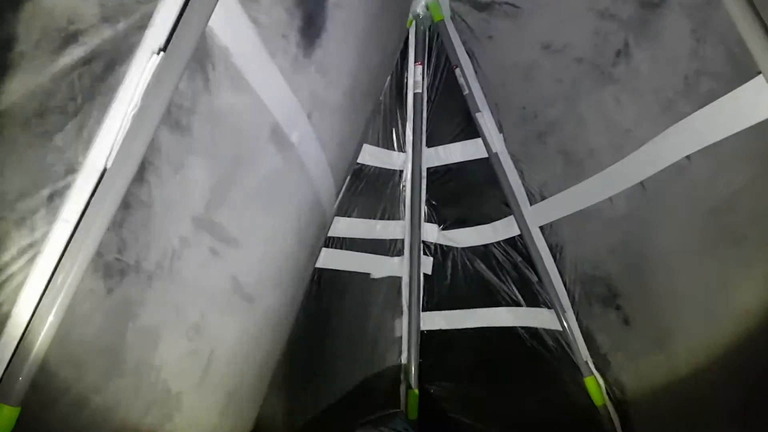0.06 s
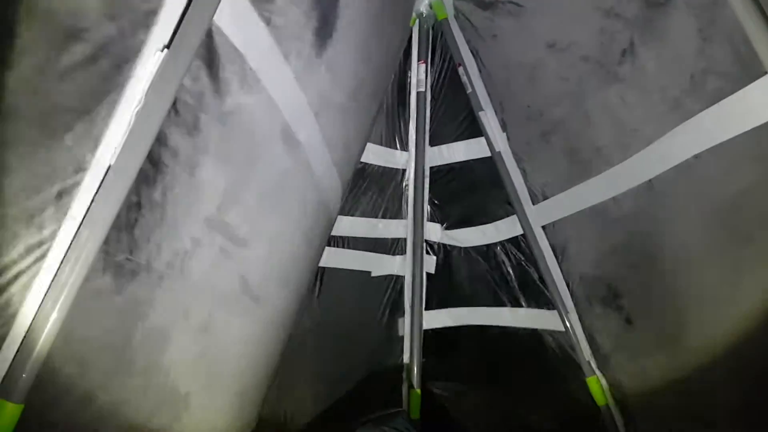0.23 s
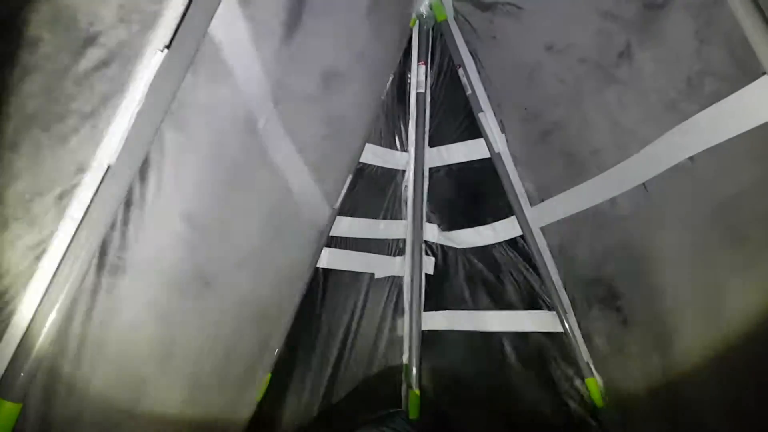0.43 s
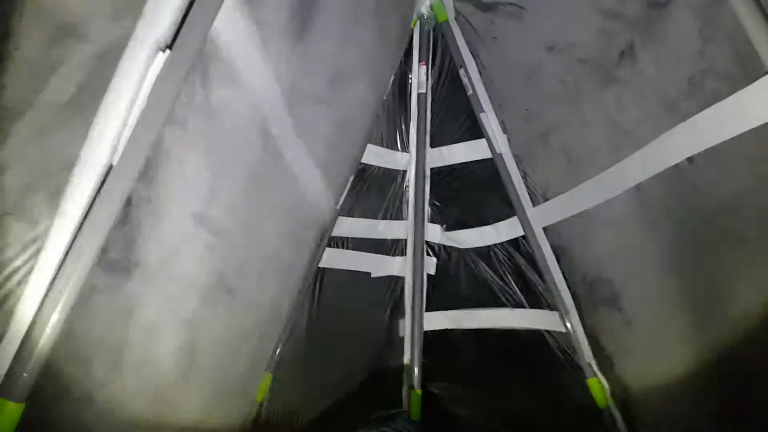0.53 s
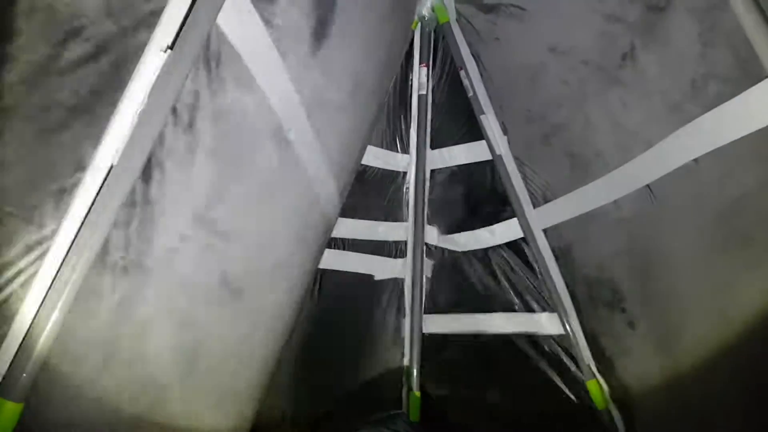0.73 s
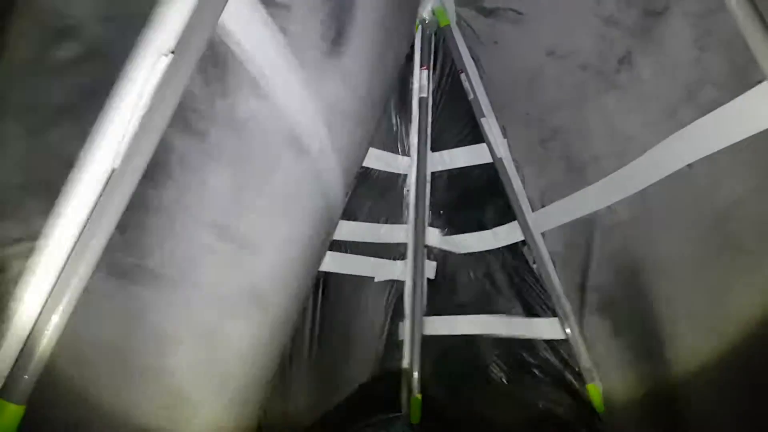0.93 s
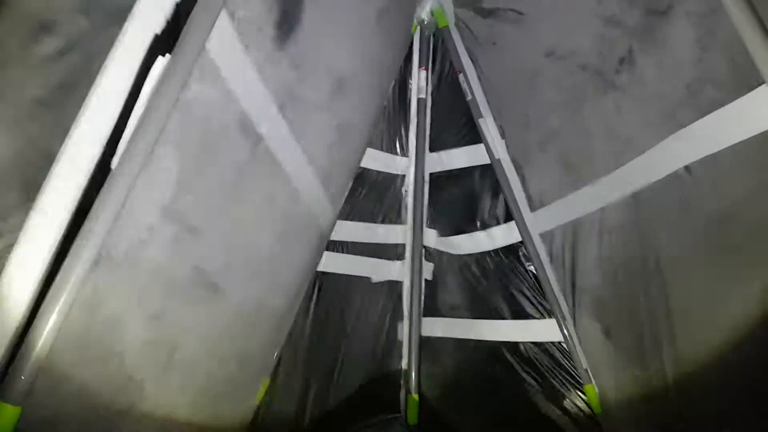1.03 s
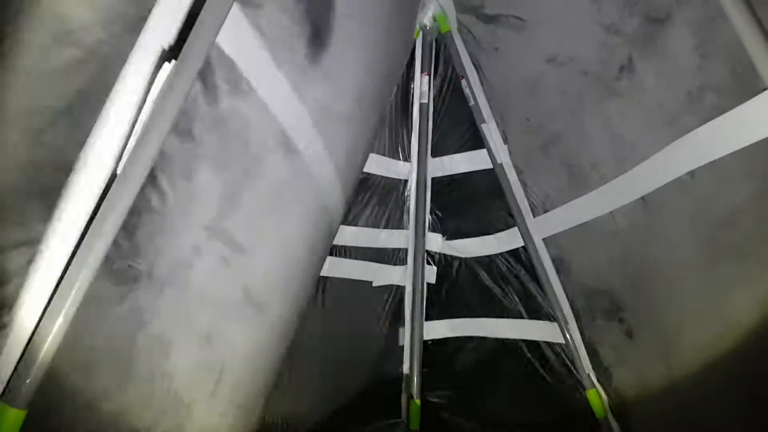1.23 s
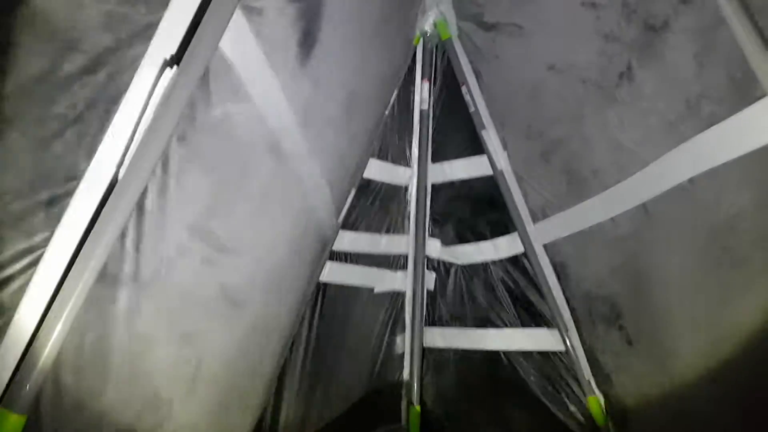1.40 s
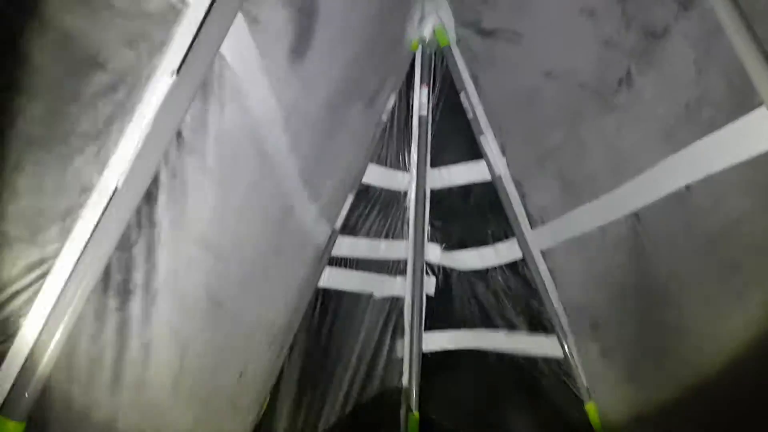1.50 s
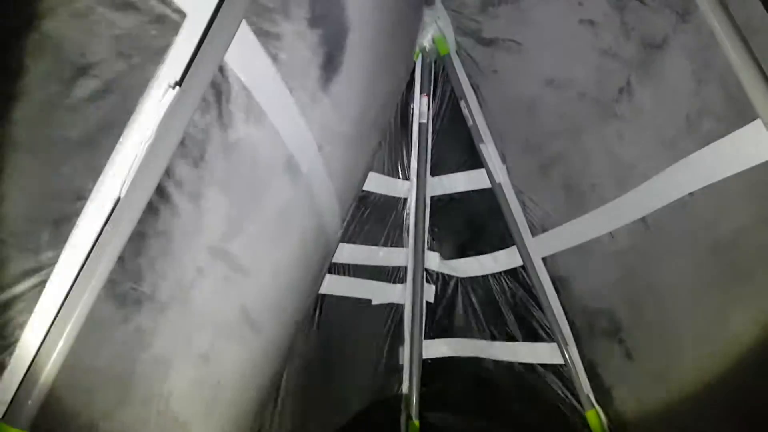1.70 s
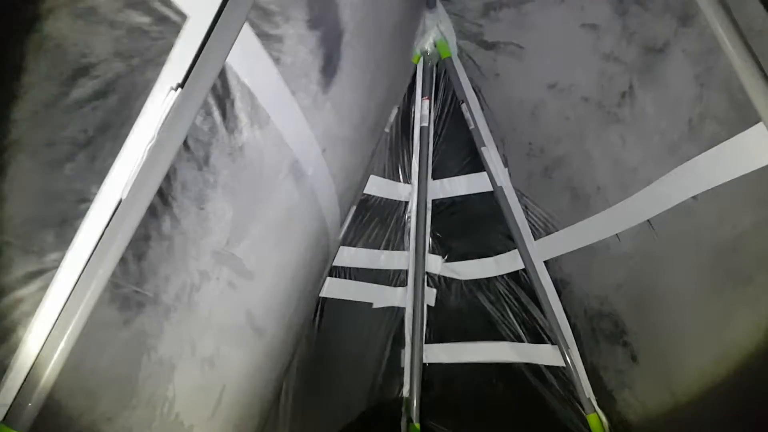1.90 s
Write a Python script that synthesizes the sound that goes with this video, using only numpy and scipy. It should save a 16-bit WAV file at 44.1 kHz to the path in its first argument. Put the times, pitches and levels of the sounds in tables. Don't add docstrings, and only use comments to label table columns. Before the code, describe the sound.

Plastic sheeting of a small tent rustles quietly in wind, heard close in stereo. From about 0.4 s a gust brings dense crackling, slaps, bright swishes against poles and low panel thumps, strong through 1.1 s, with heavy thumps near 0.9 and 1.1 s. After a brief lull, hard ringing snaps crack around 1.4 s, then it fades to soft rumble and faint crackles, with a small flap near 1.8 s.

```python
import sys
import numpy as np
from scipy import signal
from scipy.fft import rfft, irfft, next_fast_len
from scipy.io import wavfile
from scipy.ndimage import uniform_filter1d

SR = 44100
rng = np.random.default_rng(int(sys.argv[2]) if len(sys.argv) > 2 else 0)


def put_to_file(sound):
    columns = np.atleast_2d(sound).T
    safe = np.clip(columns, -1, 1)
    whole_steps = np.round(safe * 32767)
    wavfile.write(sys.argv[1], SR, whole_steps.astype(np.int16))


def field_ratio(decibels):
    return 10 ** (np.asarray(decibels, dtype=float) / 20)


N = 85995


def colour(x, points):
    hz, db = np.array(points, float).T
    f = np.maximum(np.fft.rfftfreq(8192, 1 / SR), 5)
    cepstrum = irfft(np.interp(np.log(f), np.log(hz), db) * np.log(10) / 20)
    cepstrum[1:4096] *= 2
    cepstrum[4097:] = 0
    response = irfft(np.exp(rfft(cepstrum)))[None, :4096]
    return signal.fftconvolve(x, response, axes=1)[:, :N]


def unit(x):
    return x / np.sqrt(np.mean(x ** 2))


def walk(rate):
    hold = int(SR / rate)
    steps = np.repeat(rng.standard_normal(N)[:N // hold + 1], hold)
    return 1.4 * uniform_filter1d(uniform_filter1d(steps, hold), hold)[:N]


# time in seconds, force on the panels in dB, creasing relative to it in dB.
GUSTS = [(0, -34, -2), (.17, -30.5, -4.5), (0.268, -20.5, -5.5), (.35, -28, 2.5), (.43, -15.5, -5),
         (0.521, -24, -2), (.62, -22, -2.5), (.75, -22.5, -2), (.9, -18, -5.5), (1.05, -23, -1.5),
         (1.1, -22.5, -3.5), (1.181, -23.5, -4.5), (1.23, -31, -4), (1.4, -27.5, 2), (1.5, -29, -5.5),
         (1.6, -36.5, -3), (1.8, -32, -8), (1.95, -33, -11)]


def gust(col):
    g = np.array(GUSTS)
    return np.interp(np.arange(N) / SR, g[:, 0], g[:, col])


def creasing():
    return gust(1) + gust(2)


# frequency in Hz, level in dB per Hz.
PANEL_COLOUR = [(15, -31), (30, -14), (60, -3.5), (120, -7), (250, -8), (380, -15), (1100, -26.5),
                (2000, -74.5)]
DEEP_HZ, DEEP_FORCE_DB, DEEP_FOLLOWS = 75, -22, 0.17


def billow():
    rumble = unit(colour(rng.standard_normal((3, N)), PANEL_COLOUR))
    deep = signal.sosfiltfilt(signal.butter(2, DEEP_HZ, fs=SR, output="sos"), rumble)
    swell = field_ratio(DEEP_FOLLOWS * (gust(1) - DEEP_FORCE_DB))
    return (rumble - deep + deep * swell) * field_ratio(gust(1) + 1.6 * walk(20.28))


def edge(f, hz):
    return 1 - f ** 6 / (f ** 6 + hz ** 6. + 1e-9)


SIZE_EDGES_HZ = [0, 900, 2200, 5000, 8500, SR]
POP_S, TOGETHER = 0.01, 0.37


def clicks(rate, spread_db):
    hit, size = rng.random((2, len(SIZE_EDGES_HZ), N))
    power = (hit < rate / SR) * field_ratio(-2 * spread_db * np.log(size + 1e-9))
    power = signal.lfilter([1], [1, -np.exp(-np.log(1e6) / (POP_S * SR))], power)
    f = np.fft.rfftfreq(N, 1 / SR)
    noise = rfft(rng.standard_normal((3, N)))
    out = np.zeros((3, N))
    for own, lo, hi in zip(power[1:], SIZE_EDGES_HZ, SIZE_EDGES_HZ[1:]):
        band = irfft(noise * (edge(f, hi) - edge(f, lo)), N)
        out += np.sqrt(TOGETHER * power[0] + (1 - TOGETHER) * own) * band
    return unit(out)


def bumps(rows):
    t, r = np.arange(N) / SR, np.array(rows)
    bells = .5 ** ((2 * (t - r[:, :1]) / r[:, 1:2]) ** 2)
    return np.sqrt((field_ratio(2 * r[:, 2:3]) * bells).sum(0))


# frequency in Hz, level in dB per Hz.
CREASE_COLOUR = [(150, -16.5), (500, -4), (1000, -5), (2500, -9), (4500, -19), (6000, -32), (8300, -32),
                 (16000, -58)]
# time in seconds, length in seconds, level in dB.
SLAPS = [(.112, 0.0061, -56), (.196, 0.013, -31.5), (.28, 0.05, -31), (.389, 0.0051, -24),
         (.405, 0.0043, -14.5), (.436, 0.0074, -25), (.462, .015, -26), (.531, 0.0041, -26),
         (.599, 0.0056, -17.5), (.635, 0.024, -21.5), (.717, 0.0037, -19), (.751, 0.028, -24),
         (.802, 0.0092, -22.5), (.853, 0.013, -19), (.89, 0.0058, -19.5), (.927, 0.062, -19.5),
         (1.006, 0.014, -18.5), (1.031, 0.016, -20), (1.075, 0.0026, -12), (1.09, 0.012, -17.5),
         (1.124, 0.01, -21), (1.157, 0.01, -24.5), (1.145, 0.0083, -31.5), (1.195, 0.013, -29),
         (1.273, 0.0045, -28), (1.345, .007, -25), (1.37, .009, -23), (1.404, 0.0027, -19),
         (1.416, 0.016, -19.5), (1.473, 0.0059, -28), (1.502, 0.033, -32.5), (1.813, 0.0035, -32),
         (1.905, 0.0087, -37.5)]
CREASE_RATE, CREASE_SPREAD_DB, FLUTTER_DB = 1200, 1.5, -0.5
SLAP_RATE, SLAP_SPREAD_DB = 2500, 2.5


def crackle():
    steady = unit(colour(clicks(CREASE_RATE, CREASE_SPREAD_DB), CREASE_COLOUR))
    steady = steady * field_ratio(creasing() + FLUTTER_DB * walk(30.1))
    slap = unit(colour(clicks(SLAP_RATE, SLAP_SPREAD_DB), CREASE_COLOUR))
    return steady + slap * bumps(SLAPS)


# frequency in Hz, level in dB per Hz.
SLIDE_COLOUR = [(1500, 5), (4000, 6.5), (8200, 0.5), (8800, -7.5), (10500, -6), (13000, -1), (14500, -7.5),
                (16000, -0.5)]
# time in seconds, length in seconds, level in dB, brightness in dB.
SWISHES = [(0.065, 0.049, -43.5, 2), (0.11, 0.014, -40.5, 2), (.15, 0.048, -43.5, 6),
           (0.283, 0.033, -51, 14), (0.32, 0.014, -42, 0), (0.387, 0.013, -28, 6.5),
           (0.409, 0.016, -36.5, -1.5), (0.437, 0.005, -33, -0.5), (0.511, 0.015, -40, 1),
           (0.53, 0.011, -39, -4.5), (0.596, 0.019, -40, 3), (0.644, 0.025, -38, -1),
           (0.678, 0.024, -38, -1), (0.702, 0.021, -34.5, 3), (0.774, 0.021, -40.5, -2),
           (0.808, 0.02, -42, -0.5), (0.853, 0.009, -43.5, -8), (0.888, 0.024, -36.5, 0),
           (1.027, 0.0058, -37, 3), (1.064, .008, -38, 5), (1.084, 0.014, -39, -3.5),
           (1.263, 0.025, -37, 0), (1.341, 0.0048, -43, 10), (1.371, 0.0048, -35, 6),
           (1.412, 0.038, -43.5, -1.5), (1.473, 0.0058, -49, -2), (1.502, 0.0049, -49.5, -5),
           (1.68, 0.024, -60, -5), (1.754, 0.029, -53, -1), (1.86, .04, -61, 0), (1.196, 0.012, -61, -4),
           (1.902, 0.017, -55.5, -4.5)]
SLIDE_RATE, SLIDE_SPREAD_DB = 3800, 2
SLIDE_DB, SLIDE_FOLLOWS, SWISH_DB = -38, 0.95, 12


def slide():
    bed = field_ratio(SLIDE_DB + SLIDE_FOLLOWS * (creasing() + 30) + 2.2 * walk(20.12))
    friction = unit(colour(clicks(SLIDE_RATE, SLIDE_SPREAD_DB), SLIDE_COLOUR))
    highpass = signal.butter(4, SIZE_EDGES_HZ[4], "high", fs=SR, output="sos")
    top = signal.sosfiltfilt(highpass, friction)
    r = np.array(SWISHES)
    bright = bumps(r) * field_ratio(SWISH_DB)
    dull = bumps(np.c_[r[:, :2], r[:, 2] - r[:, 3]]) * field_ratio(SWISH_DB)
    return top * np.hypot(bed, bright) + (friction - top) * np.hypot(bed, dull)


TICK_HZ = 175 * 2 ** np.arange(0, 5.1, .5)
TICK_RATE, TICK_SPREAD_DB, TICK_Q, TICK_DB = 66, 3, 1.23, -9


def ticks():
    hit, size, sign = rng.random((3, len(TICK_HZ), N))
    kicks = (hit < TICK_RATE / SR) * field_ratio(-TICK_SPREAD_DB * np.log(size + 1e-9)) * np.sign(sign - .5)
    rung = []
    for hz, kick in zip(TICK_HZ, kicks):
        ring = unit(signal.lfilter(*signal.iirpeak(hz, TICK_Q, fs=SR), kick))
        rung.append(ring * (hz / 1000) ** -.3)
    rung = np.array(rung)
    both = rung.sum(0)
    apart = rung[::2].sum(0) - rung[1::2].sum(0)
    return unit(np.array([both, both, apart])) * field_ratio(creasing() + TICK_DB)


def rings(rows, cycles, sweep):
    out = np.zeros(N)
    for s, db, hz in rows:
        i = np.arange(int(s * SR) + 1, min(int((s + 4 * cycles / hz) * SR), N))
        c = (i / SR - s) * hz
        shape = (1 - np.exp(-c / 0.3)) * np.exp(-(c / cycles) ** 2)
        out[i] -= field_ratio(db) * np.sin(2 * np.pi * c ** sweep) * shape
    return out


# time in seconds, level in dB, pitch in Hz.
THUMPS = [(.0815, -22, 114), (.404, -39, 165), (.4155, -14, 158), (.4315, -19, 134), (.545, -14, 134),
          (.783, -13.5, 148), (.8775, -4, 169), (.981, -14, 128), (1.0748, -4, 176), (1.171, -15, 132),
          (1.291, -17.5, 147), (1.3385, -11, 237), (1.367, -13.5, 150), (1.4155, -10, 230),
          (1.44, -13.5, 293), (1.471, -24, 207), (1.5015, -17, 180), (1.79, -22, 158), (1.859, -20.5, 170)]
# time in seconds, level in dB, pitch in Hz.
MORE_THUMPS = [(0.0513, -26, 380), (.139, -24.5, 226), (0.2683, -22, 193), (0.311, -22, 272),
               (0.3224, -17.5, 380), (0.3799, -14.5, 159), (0.408, -6, 315), (0.4386, -7, 123), (.46, -10.5, 274),
               (.476, -14.5, 273), (0.4823, -14.5, 161), (0.511, -11.5, 159), (0.5499, -9.5, 193),
               (.623, -13, 317), (.649, -10, 266), (.682, -14, 314), (0.697, -12, 113), (0.7164, -15, 320),
               (0.765, -13.5, 160), (0.806, -9, 231), (0.857, -11, 378), (0.8991, -15, 383), (.92, -11.5, 232),
               (0.9605, -12.5, 100), (1.0238, -12.5, 320), (1.045, -11, 226), (1.089, -28, 190),
               (1.098, -8.5, 150), (1.196, -17.5, 380), (1.271, -22, 190), (1.4002, -15, 230), (0.451, -11.5, 75),
               (.418, -14, 80), (1.08, -13, 90), (.846, -13, 95), (.042, -24, 95), (1.198, -17.5, 90),
               (1.662, -27, 270), (1.6826, -22, 273)]


def thumps():
    swings = rings(THUMPS + MORE_THUMPS, cycles=1.0, sweep=0.65)
    highpass = signal.butter(2, DEEP_HZ - 20, "high", fs=SR, output="sos")
    low = signal.sosfiltfilt(highpass, swings)
    return field_ratio(6) * low * np.array([[1], [.3], [-.3]])


# time in seconds, level in dB, ring in Hz.
CRACKS = [
    (.4229, -21, 1200),
    (.452, -24, 885),
    (1.0857, -13, 3300),
    (1.397, -12, 1800),
    (1.4712, -19, 960),
    (1.4714, -22, 3570),
    (1.416, -13.5, 2300),
    (1.502, -20, 1220),
    (1.812, -43, 2420),
]
# time in seconds, level in dB, ring in
# Hz.
MORE_CRACKS = [(0.1126, -22, 3900), (0.223, -20, 4000), (0.269, -19, 1980), (0.281, -20, 1200),
               (0.387, -12, 2850), (.402, -17, 2380), (.4025, -16.5, 606), (0.409, -18, 2380),
               (.4121, -21, 2380), (0.4228, -16, 2830), (.5258, -20, 4760), (0.5912, -16, 1680),
               (0.624, -19, 2830), (.6664, -15, 2000), (0.6794, -19, 4000), (0.7506, -13, 1410),
               (0.7755, -13.5, 1680), (0.799, -17, 4760), (.8217, -18, 2400), (0.8496, -20, 4000),
               (.8558, -26, 4000), (0.891, -16, 2380), (0.893, -10.5, 4760), (.9168, -16, 2000),
               (.924, -15, 990), (0.9411, -9.5, 1705), (0.992, -15.5, 830), (1.0993, -22, 4760),
               (1.157, -22, 4000), (1.173, -22, 2000), (1.2575, -23, 4760), (1.27, -22, 4000),
               (1.3445, -23, 2850), (1.3691, -14.5, 2860), (1.399, -21, 4760), (1.4177, -21, 4760),
               (1.5013, -26, 4700), (1.5084, -23, 1170), (1.5107, -27, 2830), (1.9049, -35, 2830)]
# time in seconds, level in dB, ring in Hz.
SINGING = [
    (1.0738, -12, 1190),
    (1.0742, -10, 2040),
    (1.4022, -9.5, 704),
    (1.4032, -8, 2400),
    (1.4035, -11, 3630),
    (1.4155, -15, 714),
]


def cracks():
    high = rings(CRACKS + MORE_CRACKS, cycles=2.8, sweep=1.0) + rings(SINGING, cycles=3.6, sweep=1)
    return high * np.array([[1], [.9], [.9]])


LAG_S, ALIKE_HZ, ALIKE_HIGH = 0.000416, 693, 0.017


def ports(x):
    n = next_fast_len(N + 4096)
    f = np.fft.rfftfreq(n, 1 / SR)
    low = 1 / (1 + (f / ALIKE_HZ) ** 2)
    alike = np.clip(ALIKE_HIGH + (.96 - ALIKE_HIGH) * low, 0, 1)
    late = np.exp(-2j * np.pi * f * LAG_S * (1 - low))
    streams = rfft(x, n)
    common = streams[0] * np.array([late ** 0, late])
    return irfft(np.sqrt(alike) * common + np.sqrt(1 - alike) * streams[1:], n)[:, :N]


def scene():
    return ports(billow() + crackle() + slide() + ticks() + thumps() + cracks())


def band_limit(x):
    return signal.sosfilt(signal.butter(12, 15800, fs=SR, output="sos"), x)


# frequency in Hz, left minus right in dB.
PORT_COLOUR = [(60, -1.5), (300, -1), (700, -2), (1300, -5), (2400, -6), (4800, -11.5), (8000, -0.5),
               (15000, 3)]
LIMIT, TOP_HZ = 1.3, 15750


def record(dry):
    left = colour(dry[:1], [(hz, db / 2) for hz, db in PORT_COLOUR])
    right = colour(dry[1:2], [(hz, -db / 2) for hz, db in PORT_COLOUR])
    rounded = LIMIT * np.tanh(np.vstack([left, right]) / LIMIT)
    lowpass = signal.butter(12, TOP_HZ, fs=SR, output="sos")
    return band_limit(signal.sosfiltfilt(lowpass, rounded))


dry = scene()
out = record(dry)
put_to_file(out)
```